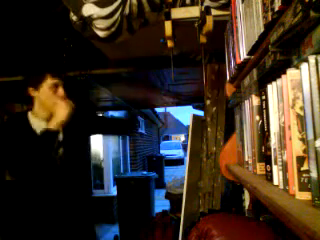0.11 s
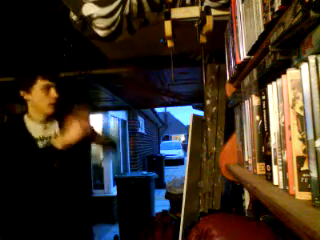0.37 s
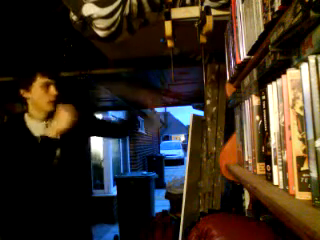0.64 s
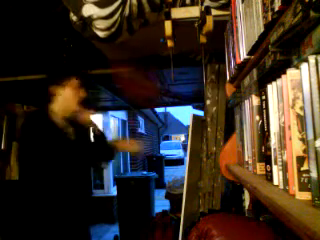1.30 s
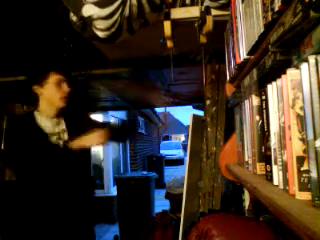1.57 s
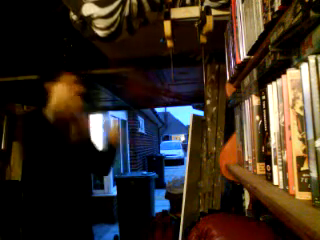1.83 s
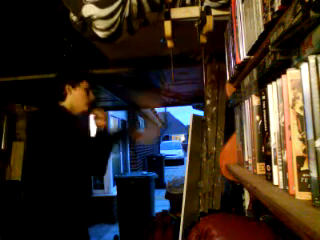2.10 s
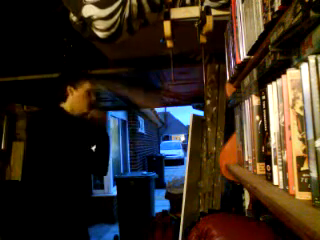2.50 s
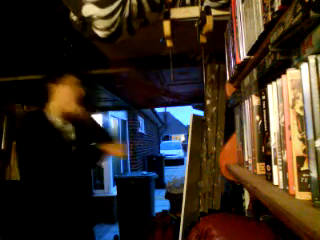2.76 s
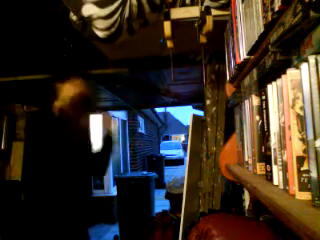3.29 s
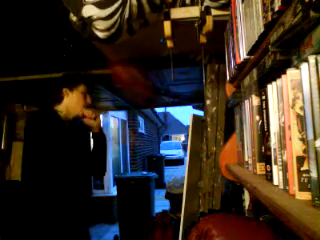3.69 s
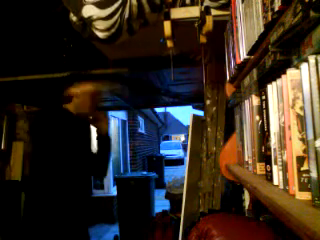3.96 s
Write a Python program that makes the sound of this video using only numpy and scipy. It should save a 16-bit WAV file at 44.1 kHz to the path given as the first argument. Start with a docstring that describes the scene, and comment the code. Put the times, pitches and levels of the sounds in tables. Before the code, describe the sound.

A speed bag is punched about twice a second in a small garage, each punch followed by quick booming rebounds off its wooden board. The swivel clacks, grinds and squeaks lightly between the hits.

```python
"""Quick, booming thumps, three strong ones to each punch: a speed bag in a small, cluttered garage.
Punched about twice a second, the bag slams the far side of its overhead board, then the near side,
then, weakly, the far side again. Every hit is a boom of bag and board, a wooden knock, a leather slap,
a rattle of the mount and a clack of the swivel the bag hangs from. The swivel also grinds and squeaks
in its socket as the bag swings. A faint hush lies underneath."""
import sys
import numpy as np
from scipy import signal
from scipy.fft import rfft, irfft, next_fast_len
from scipy.io import wavfile

SR = 44100
rng = np.random.default_rng(int(sys.argv[2]) if len(sys.argv) > 2 else 0)


def digitize_waveform(pressure):
    """Quantize a signal to 16-bit integers and store it at the path in sys.argv[1].

    Rows of a 2-D input are taken as channels; values are limited to [-1, 1].
    """
    field = np.atleast_2d(pressure).T
    bounded = np.clip(field, -1, 1)
    quanta = np.round(bounded * 32767).astype(np.int16)
    wavfile.write(sys.argv[1], SR, quanta)


N = 176400
T = np.arange(SR // 2) / SR  # time within one short sound [s]

# Hits by the fist and on each side of the board; levels compare only within one kind of sound
# (time [s], boom level [dB], clack level [dB], slap level [dB])
PUNCH_HITS = [(0.19, -0.5, -15.5, -41.5), (0.6914, 1.5, -17, -25), (1.1918, -1.2, -10.5, -28.5),
              (1.6363, 0.5, -18, -36.5), (2.1105, -2.3, -23.5, -35), (2.5868, 1.1, -21, -31.5),
              (3.0354, 0, -9.5, -27.5), (3.4951, -5, -36.5, -50.5)]
FAR_HITS = [(0.0891, -6.5, -25, -37), (0.237, 0.1, -14.5, -27), (0.5589, -7.5, -24, -37.5),
            (0.7496, -0.5, -21, -29.5), (1.0652, -8.5, -27.5, -42.5), (1.2419, -0.1, -18, -25),
            (1.5328, -9, -26, -37.5), (1.684, -0.3, -16.5, -28), (1.9887, -9, -25.5, -41),
            (2.1644, 0, -14.5, -27), (2.4606, -7.5, -24.5, -37.5), (2.6392, -0.9, -14, -25),
            (2.9285, -8, -27.5, -43), (3.0854, -1, -17, -24), (3.392, -9, -32, -33.5),
            (3.5575, -1, -16.5, -26), (3.9745, -5.5, -34, -37.5)]
NEAR_HITS = [(0.3714, -1.7, -22.5, -26), (0.8821, -1.1, -19.5, -26.5), (1.3625, -1.7, -23.5, -27.5),
             (1.8107, -0.37, -21, -27), (2.2869, 0.069, -18, -27), (2.7589, -1.1, -17.5, -28),
             (3.2134, -1.7, -17, -28.5), (3.7315, -0.43, -20.5, -30)]
# The bag's note at the fist, far side and near side; a fade time is how long a 60 dB drop takes
# (pitch [Hz], fade time [s], relative level [dB])
BAG_NOTES = [(100.7, .078, -12.2), (113.9, .096, -11.2), (107.3, .032, -12.7)]
# Strong echoes of the boom from each spot; a minus flips the wave (delay [s], strength [factor])
PUNCH_ECHOES = [(.002, -.82), (.0052, -.25), (.0183, .84), (.0297, .35)]
FAR_ECHOES = [(.002, -1), (.0039, .52), (.0176, .98), (.0299, .8)]
NEAR_ECHOES = [(.0027, -.37), (.0114, .46), (.0181, .92), (.0294, .73)]
def bag_hits():
    """Each hit booms, knocks the wood, slaps the leather, shakes the mount and jerks the swivel."""
    out = np.zeros(N)
    spots = [(PUNCH_HITS, PUNCH_ECHOES), (FAR_HITS, FAR_ECHOES), (NEAR_HITS, NEAR_ECHOES)]
    for (hits, echoes), note in zip(spots, BAG_NOTES):
        boom = bag_boom(*note, echoes)
        for start, boom_db, clack_db, slap_db in hits:
            slap = leather_slap(boom_db)
            add(out, start, amp(boom_db) * in_room(boom, echo_db=-16))
            add(out, start, amp(boom_db - 1) * wood_knock())
            add(out, start, amp(slap_db + 23.5) * (slap + amp(-4.5) * mount_rattle()))
            add(out, start, amp(clack_db + 16.5) * in_room(swivel_ring(hz=1660), echo_db=-1))
    return out


# Low notes at which board and garage ring (pitch [Hz], fade time [s], strength [factor])
BOARD_AND_ROOM_NOTES = [(62.6, 0.2, 2), (121.8, 0.18, 3), (155.3, 0.11, 0.72), (204, 0.24, 0.27),
                        (322, .06, 0)]
def bag_boom(bag_hz, bag_fade_s, db, echoes, low_cut_hz=32, high_cut_hz=412):
    """The bag rings for a few cycles, sets board and garage ringing and echoes off nearby surfaces."""
    s = 2j * np.pi * np.fft.rfftfreq(len(T), 1 / SR)  # frequency axis for the filters below

    def ring(hz, fade_s):
        """The spectrum of one fading note."""
        return s / ((s + np.log(1000) / fade_s) ** 2 + (2 * np.pi * hz) ** 2)

    board_and_room = 1 + sum(gain * 2 * np.log(1000) / fade_s * ring(hz, fade_s)
                             for hz, fade_s, gain in BOARD_AND_ROOM_NOTES)
    echo_paths = 1 + sum(gain * np.exp(-s * delay) for delay, gain in echoes)
    low_cut = s / (s + 2 * np.pi * low_cut_hz)
    soft_contact = 1 / (1 + s / (2 * np.pi * high_cut_hz)) ** 2
    spectrum = ring(bag_hz, bag_fade_s) * board_and_room * echo_paths * low_cut * soft_contact
    return amp(db) * SR * irfft(spectrum, len(T))


# The dull tone of the wooden board (frequency [Hz], relative level [dB])
WOOD_TONE = [(30, -22), (60, -7.5), (130, 11.5), (210, 9.5), (265, -5), (315, -16), (500, -8), (700, -0.5),
             (1000, -13), (1400, -1), (2500, -50)]
def wood_knock():
    """The struck board gives a short, hollow knock."""
    return smack(WOOD_TONE, fade_s=0.025, echo_db=5.5)


# The bright tone shared by slap and rattle (frequency [Hz], relative level [dB])
LEATHER_TONE = [(300, -19), (1000, -23), (2000, 5), (3000, 2), (4300, 3), (5200, -2.5), (6600, -3.5),
                (7400, -23.5)]
def leather_slap(boom_db):
    """The leather cracks on contact; weak hits slap for longer."""
    return smack(LEATHER_TONE, fade_s=0.007 * np.exp(-0.24 * boom_db), echo_db=2.5)


def mount_rattle(ticks_per_s=590, rise_s=0.016):
    """The mount chatters for a moment after a blow."""
    ticks = (rng.random(len(T)) < ticks_per_s / SR) * rng.standard_normal(len(T))
    swell = T * np.exp(-T / rise_s)
    return unit(coloured(ticks * swell, LEATHER_TONE))


# The notes in the swivel's ring (pitch [times the main pitch], relative level [dB], fade time [s])
SWIVEL_NOTES = [(.45, -12, 0.0091), (0.841, -26, 0.03), (1.002, 9, 0.0064), (1.2, -5.5, 0.0084),
                (1.649, -14.5, .005)]
def swivel_ring(hz):
    """The jolted swivel rings briefly, a little differently every time."""
    ring = np.zeros(len(T))
    for ratio, db, fade_s in SWIVEL_NOTES:
        loudness = amp(db + rng.normal(0, 6) - 60 * T / fade_s)
        pitch = hz * ratio * (1 + rng.normal(0, 0.025))
        ring += loudness * np.sin(2 * np.pi * pitch * T)
    return unit(ring)


# When the swivel grinds in its socket (time [s], length [s], level [dB], pitch [Hz])
SWIVEL_GRINDS = [(0, 0.029, -37.5, 1510), (0.087, 0.042, -34.5, 1720), (0.159, 0.14, -41, 1520),
                 (.285, 0.092, -36.5, 1390), (0.58, 0.019, -35, 1620), (0.632, 0.04, -35, 1450),
                 (0.704, 0.075, -32.5, 1530), (0.794, 0.11, -38, 1395), (0.965, 0.055, -41.5, 1470),
                 (1.05, 0.068, -38.5, 1450), (1.142, 0.025, -41.5, 1460), (1.291, 0.032, -33, 1330),
                 (1.406, 0.11, -37, 1506), (1.596, 0.022, -37, 1170), (1.629, 0.026, -27.5, 1310),
                 (1.734, 0.021, -30, 1370), (1.868, 0.027, -35.5, 1650), (1.897, 0.075, -37, 1300),
                 (2.009, 0.051, -39, 1530), (2.122, 0.017, -33, 1476), (2.195, 0.097, -36, 1560),
                 (2.473, 0.034, -42, 1396), (2.591, 0.021, -29, 1360), (2.691, 0.076, -37, 1410),
                 (2.826, 0.045, -35, 1480), (2.929, 0.11, -42.5, 1570), (3.136, 0.074, -33.5, 1355),
                 (3.273, 0.076, -36, 1460), (3.405, 0.13, -43, 1470), (3.498, 0.091, -29, 1570),
                 (3.567, 0.064, -27, 1530), (3.622, .105, -35, 1790), (3.728, 0.019, -41, 1730),
                 (3.827, 0.047, -31.5, 1400), (3.865, 0.03, -61, 1450), (3.946, 0.045, -34, 1680)]
def swivel_grind(slips_per_s=900, scatter_db=4, ramp_s=0.0094):
    """The dry swivel sticks and slips unevenly; every slip makes it ring."""
    out = np.zeros(N)
    for start, length, db, hz in SWIVEL_GRINDS:
        pressure = np.clip(np.minimum(T, length - T) / ramp_s, 0, 1)
        slips = rng.random(len(T)) < slips_per_s / SR
        strength = amp(scatter_db * rng.standard_normal(len(T)))
        grind = signal.fftconvolve(slips * strength * pressure, swivel_ring(hz))[:len(T)]
        add(out, start, amp(db) * np.sqrt(length * SR) * unit(in_room(grind, echo_db=-2)))
    return out


# When the swivel squeaks (time [s], relative level [dB], pitch [Hz])
SWIVEL_SQUEAKS = [(0.099, -31, 1793), (0.171, -27, 1540), (0.19, -23, 1500), (.209, -28, 1670),
                  (.221, -23.5, 1846), (0.652, -33, 1440), (0.706, -22.5, 1823), (1.306, -31.5, 1376),
                  (1.449, -37.5, 2490), (1.745, -22, 1383), (1.881, -28.5, 1625), (2.134, -27.5, 1510),
                  (2.605, -43, 1320), (2.845, -31, 1450), (3.315, -23.5, 1206), (3.329, -27.5, 1500),
                  (3.505, -27.5, 1475), (3.528, -29, 1480), (3.592, -18.5, 1632), (3.741, -26, 1710)]
def swivel_squeaks(rise_s=0.003, roughness=0.032):
    """The swivel catches: its main note swells and dies with an unsteady pitch."""
    out = np.zeros(N)
    swell = T * np.exp(-T / rise_s)
    for start, db, hz in SWIVEL_SQUEAKS:
        wobble = roughness * np.cumsum(rng.standard_normal(len(T)))
        squeak = unit(swell * np.sin(2 * np.pi * hz * T + wobble))
        add(out, start, amp(db + 21.5) * in_room(squeak, echo_db=-6.5))
    return out


# How long sound lingers in the garage (frequency [Hz], fade time [s])
GARAGE_FADES = [(100, 0.24), (300, 0.53), (1000, 0.26), (3000, 0.32), (7000, 0.25)]
def garage_echo(build_s=0.0027):
    """Many echoes blur into one tail of noise; each frequency dies at its own speed."""
    hz, t, noise = signal.stft(rng.standard_normal(len(T)), SR, nperseg=256)
    fade = amp(-60 * t / along(GARAGE_FADES, hz)[:, None])
    _, tail = signal.istft(noise * fade, SR, nperseg=256)
    return tail[:len(T)] * (1 - np.exp(-T / build_s))


# The low tone of the background (frequency [Hz], relative level [dB])
HUSH_TONE = [(25, -16), (100, 4), (300, -13.5), (1500, -12.5), (4000, -22.5), (7000, -38)]
def garage_hush(level_db=-47):
    """A faint, steady noise fills the garage."""
    return amp(level_db) * np.sqrt(N) * unit(coloured(rng.standard_normal(N), HUSH_TONE))


def smack(tone, fade_s, echo_db):
    """A short burst of noise, plus a garage echo with the same tone."""
    crack = rng.standard_normal(len(T)) * amp(-60 * T / fade_s)
    return unit(coloured(crack, tone)) + amp(echo_db) * unit(coloured(garage_echo(), tone))


def in_room(sound, echo_db):
    """A sound plus its garage echo; echo_db is relative to the sound."""
    echo = signal.fftconvolve(sound, garage_echo())[:len(sound)]
    return sound + amp(echo_db) * np.linalg.norm(sound) * unit(echo)


def coloured(sound, tone):
    """Turn each frequency up or down as a tone table says."""
    n = len(sound)
    gains = amp(along(tone, np.fft.rfftfreq(n, 1 / SR)))
    cepstrum = irfft(np.log(gains), n)
    # fold it in half so the filter rings after a hit, never before
    cepstrum[1:n // 2] *= 2
    cepstrum[n // 2 + 1:] = 0
    return irfft(rfft(sound) * np.exp(rfft(cepstrum)), n)


def amp(db):
    """Turn decibels into a factor."""
    return 10 ** (np.asarray(db) / 20)


def unit(sound):
    """Scale to an energy of 1."""
    return sound / np.sqrt(np.sum(sound ** 2) + 1e-20)


def along(table, hz):
    """Read between the rows of a table, on a log frequency scale."""
    frequencies, values = np.transpose(table)
    return np.interp(np.log(hz + 1), np.log(frequencies + 1), values)


def add(track, start_s, sound):
    """Mix a sound into the track at the given time."""
    i = max(0, round(start_s * SR))
    track[i:i + len(sound)] += sound[:max(0, len(track) - i)]


def scene():
    """The bag and its swivel over the hush of the garage, in one channel."""
    return (bag_hits() + swivel_grind() + swivel_squeaks() + garage_hush())[None]


def record(dry):
    """Cut the treble steeply above top_hz."""
    top_hz = 7150
    size = next_fast_len(N + SR // 2)
    hz = np.fft.rfftfreq(size, 1 / SR)
    treble_cut = 1 / np.sqrt(1 + (hz / top_hz) ** 80)
    return irfft(rfft(dry, size) * treble_cut, size)[:, :N]


dry = scene()
out = record(dry)
digitize_waveform(out)
```